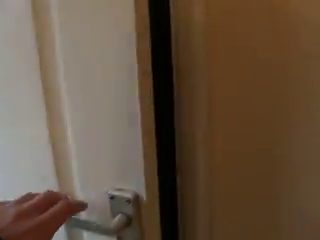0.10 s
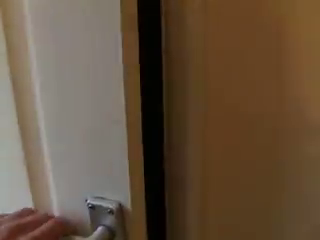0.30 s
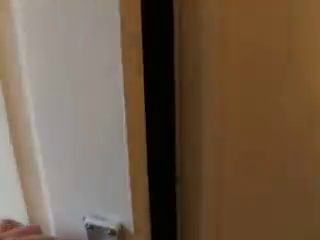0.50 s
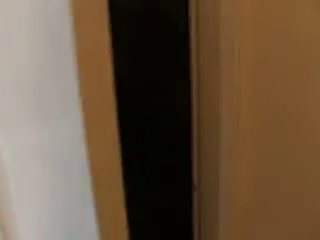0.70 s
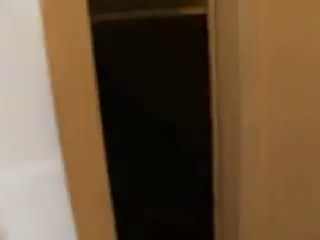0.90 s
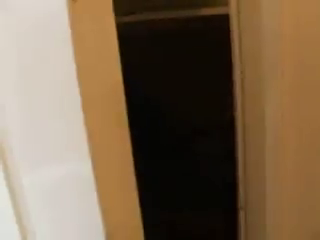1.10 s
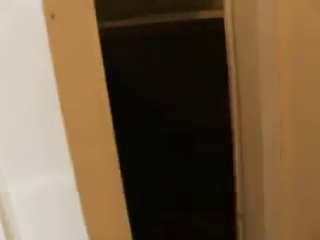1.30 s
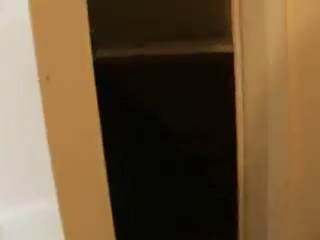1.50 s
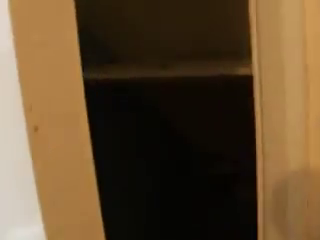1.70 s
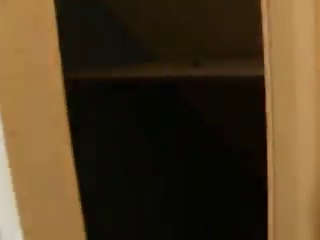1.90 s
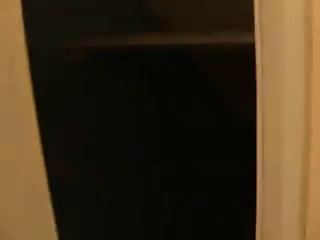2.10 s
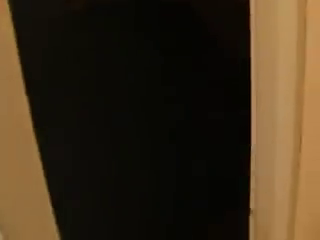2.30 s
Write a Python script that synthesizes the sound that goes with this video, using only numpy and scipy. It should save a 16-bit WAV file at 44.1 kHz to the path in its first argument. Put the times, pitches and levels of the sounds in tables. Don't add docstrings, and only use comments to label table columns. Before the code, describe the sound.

A metal door latch snaps back with one loud, bright clack close to a small, grainy microphone, then a heel ticks and steps hollowly on wooden boards, followed by two light knocks in a hallway.

```python
import sys
import numpy as np
from scipy import signal
from scipy.io import wavfile
from scipy.ndimage import uniform_filter1d

SR = 44100
rng = np.random.default_rng(int(sys.argv[2]) if len(sys.argv) > 2 else 0)


def generate_wav(sig):
    pcm = np.round(np.clip(np.atleast_2d(sig).T, -1, 1) * 32767).astype(np.int16)
    wavfile.write(sys.argv[1], SR, pcm)


def voltage_ratio(decibels):
    exponent = np.asarray(decibels, float) / 20
    return 10 ** exponent


N = 105840

# t/s, strength level/dB, damping factor/1, treble tilt/(dB per octave)
LATCH_HITS = [(0.188, -40.5, 1.2, -7), (0.1953, -44.5, 2.5, 13), (0.1983, -42.5, 2.1, 10.5),
              (0.2047, -37, 1.9, 3), (0.2145, -23.5, 5.9, 6.5), (0.2175, -28.5, 0.83, -7.5),
              (0.2337, -14, 2.78, 8.1), (0.2342, -17, 2.5, 6), (0.2373, -18.5, 1.1, -2),
              (0.2437, -25.5, 2.6, 4.5), (0.2456, -22.5, 2.2, 0.5), (0.2604, -39, 6.3, 2)]
# f/Hz, level/dB, t60/s
LATCH_MODES = [(800, -17.5, 0.009), (1452, -9, 0.036), (1890, -3.5, 0.014), (2310, -9.5, 0.022),
               (2560, -0.3, 0.041), (2820, -5.5, 0.023), (3164, -13, 0.044), (3810, -8, 0.05),
               (4370, -8, 0.022), (4630, -5.5, 0.02), (5630, -8, 0.018), (6200, -2.5, .016),
               (6940, -10, 0.018), (7865, -10.5, 0.022)]
# t/s, peak level/dB, f/Hz, t60/s
BOLT_SLAM = [
    (0.2338, 0.5, 2220, 0.009),
    (0.2337, -9, 2560, 0.029),
    (0.2354, -11, 5050, 0.011),
]
# t/s, peak level/dB, f/Hz, t60/s, spread/octave
TICKS = [(0.085, -26.5, 918, 0.012, 0.42), (0.0926, -36, 1060, 0.0054, 0.23),
         (0.8586, -16, 5660, 0.0056, 0.19), (0.8591, -23.5, 2530, 0.0064, 0.1),
         (.8588, -35.5, 1275, 0.011, 0.28), (.967, -29.5, 1710, 0.018, 0.22),
         (.983, -29.5, 1140, 0.013, 0.18), (0.9186, -19.5, 5270, 0.009, 0.42),
         (0.921, -18, 5180, 0.0065, 0.27), (0.9193, -32.5, 1053, 0.045, 0.035),
         (0.924, -20.5, 6600, 0.004, 0.19), (0.9308, -27, 1174, .012, 0.18),
         (.994, -32.5, 2090, 0.055, 0.045), (1.7558, -34.5, 2204, 0.2, 0.169),
         (1.758, -34, 7060, 0.02, 0.11), (1.8554, -22.5, 5000, 0.0063, 0.64),
         (1.862, -36, 1780, 0.15, 0.102), (1.858, -41.5, 5270, 0.11, 0.038),
         (2.212, -47, 2750, 0.0083, 0.071), (2.3647, -26.5, 6200, 0.0028, 0.2),
         (2.371, -41.5, 2150, 0.021, 0.073)]
# t/s, strength level/dB, rattle t60/s, favoured f/Hz, fall off it/(dB per octave)
STEPS = [
    (0.242, -59.5, 0.11, 139, -15),
    (.312, -45.5, .45, 424, -11),
    (.46, -53, 0.43, 550, -11),
    (.916, -34.5, 0.55, 800, -3.5),
    (.930, -34, .55, 105, -4.5),
    (1.753, -46.5, 0.14, 251, -11),
    (1.83, -52, 0.55, 413, -9.5),
    (1.05, -49.5, 0.68, 371, -28),
]
# f/Hz, width/Hz, level/dB
BOARD_MODES = [(50, 33, -7.5), (73.5, 26, 0), (105, 75, -4.5), (151, 21, -2), (210.4, 55, -6.5),
               (251, 35, -3), (297, 23.5, -7), (371, 33, -6), (451, 115, -6), (550, 85, -7),
               (704, 68, -8.5), (900, 90, -7), (1040, 240, -4.5), (1450, 300, -4)]
# t/s, length/s, level/dB,
# centre f/Hz, width/Hz
SCUFFS = [(0.186, 0.063, -44.5, 4740, 6050), (0.253, .11, -47, 5920, 2440),
          (0.456, 0.03, -45.5, 1225, 1460), (0.48, 0.053, -45, 1414, 1000),
          (0.857, 0.09, -42.5, 3900, 6000), (0.909, 0.13, -37, 5650, 5000), (0.921, 0.14, -48, 2200, 1500),
          (1.25, 0.6, -54, 1407, 3050), (1.76, 0.079, -44, 5400, 6030), (1.852, 0.054, -45, 4400, 6040),
          (2.367, 0.02, -49, 3930, 6000), (2.39, 0.11, -41, 5460, 3020), (1.3, 0.37, -61.5, 800, 117),
          (1.451, 0.55, -54.5, 6040, 4020), (0.779, 0.064, -51, 5020, 6000),
          (1.599, 0.68, -57.5, 39.6, 38.6), (0.456, 0.056, -54.5, 2900, 2500)]
# f/Hz, t60/s
HALL_T60 = [(100, 0.39), (500, 0.21), (2000, 0.2), (8000, 0.28)]
# t/s, peak level/dB, f/Hz, t60/s
SWAY = [
    (.51, -49, 4.8, 1.1),
    (.865, -53, 6.2, .9),
    (1.04, -50, 5.2, 2.6),
]
# f/Hz, level/dB
HISS_SPECTRUM = [(15, -27), (28, 5), (118, -6), (300, -7), (600, -6), (2400, -9.5), (6500, -9.5),
                 (7900, -10.5)]
# t/s, level/dB
HISS_LEVEL = [(0, -51), (.16, -52), (.31, -49.5), (.49, -53.5), (.65, -56), (.8, -54.5), (.95, -49),
              (1.269, -52.5), (1.72, -51), (1.96, -52), (2.4, -53.5)]

MODE_SPLIT, LATCH_RATTLE_S, THIN_HZ = 0.022, 0.00094, 450
BLOWS_PER_S, BOARD_SPREAD = 700, 0.049
SCUFF_RISE, SCUFF_FADE_DB = 0.061, -13
GRIT_PER_S, GRIT_DB = 3000, 4
HALL_DB, HALL_DELAY_S = -20, 0.004
PATCH_DB, HISS_TRIM_DB = 1.2, 4.5
STEP, HALF_RANGE, LEAN = np.sqrt(0.5) / 128, 128, 0.07
ANTIALIAS_HZ, CLIP, EDGE_HZ = 8220, 0.705, 16300


def evened(x):
    return x / np.sqrt(np.mean(x ** 2) + 1e-20)


def read(points, hz):
    f, value = np.transpose(points)
    return np.interp(np.log(hz + 1), np.log(f + 1), value)


def add(mix, s, sound):
    part = mix[round(s * SR):][:len(sound)]
    part += sound[:len(part)]


def ring(hz, t60, phase=0):
    t = np.arange(6000) / SR
    return voltage_ratio(-60 * t / t60) * np.sin(2 * np.pi * hz * t + phase)


def resonate(x, hz, width):
    pole = np.exp((2j * hz - width) * np.pi / SR)
    return 2 * signal.lfilter([1 - abs(pole)], [1, -pole], x).real


def grit(size, per_s, spread_db):
    sign, chance, size_draw = rng.random((size, 3)).T
    return np.sign(sign - 0.5) * (chance < per_s / SR) * voltage_ratio(-spread_db * np.log(size_draw + 0.01))


def thin(x):
    return signal.sosfilt(signal.butter(3, THIN_HZ, "high", fs=SR, output="sos"), x)


def latch():
    out, t = np.zeros(N), np.arange(200) / SR
    for s, db, damp, tilt_db in LATCH_HITS:
        modes = 0
        for hz, level_db, t60 in LATCH_MODES:
            a, b, c = rng.uniform(-1, 1, 3)
            twin_hz = hz * (1 + MODE_SPLIT * np.sign(b) * (1 + abs(b)))
            pair = ring(hz, t60 / damp, np.pi * a) + 0.69 * ring(twin_hz, t60 / damp, np.pi * c)
            modes = modes + voltage_ratio(db + level_db + tilt_db * np.log2(hz / 2500)) * pair
        rattle = np.exp(-t / LATCH_RATTLE_S) * grit(len(t), 5000, 1.1) * 0.5
        rattle[0] = 1
        add(out, s, np.convolve(modes, rattle / np.linalg.norm(rattle)))
    for s, db, hz, t60 in BOLT_SLAM:
        add(out, s, voltage_ratio(db) * ring(hz, t60))
    return thin(out)


def steps():
    out, t = np.zeros(N), np.arange(SR // 2) / SR
    for s, db, t60, spot_hz, fall_db in STEPS:
        blows = grit(len(t), BLOWS_PER_S, 2.56)
        blows[0] = 3.3
        blows = blows * voltage_ratio(-60 * t / t60)
        detune = 1 + BOARD_SPREAD * rng.standard_normal(len(BOARD_MODES))
        body = 0
        for k, (f, width, level_db) in enumerate(BOARD_MODES):
            hz = f * detune[k]
            gain = (-1) ** k * voltage_ratio(level_db + fall_db * abs(np.log2(f / spot_hz))) / np.sqrt(width)
            body = body + gain * resonate(resonate(blows, hz, width), hz, 4 * width)
        add(out, s, voltage_ratio(db) * body / np.sqrt(np.mean(body[:3000] ** 2)))
    return out


def ticks():
    out = np.zeros(N)
    for s, db, hz, t60, octaves in TICKS:
        jitter, phases = rng.uniform(-1, 1, (2, 7))
        places = np.linspace(-1, 1, 7) + jitter / 7
        bunch = sum(ring(hz * 2 ** (octaves * place), t60, phase) for place, phase in zip(places, phases))
        add(out, s, voltage_ratio(db) / 4 * bunch)
    return thin(out)


def scuffs():
    out = np.zeros(N)
    for s, length, db, hz, width in SCUFFS:
        rub = grit(SR // 2, GRIT_PER_S, GRIT_DB)
        rub = evened(rub) + 0.97 * rng.standard_normal(len(rub))
        u = np.arange(len(rub)) / SR / length
        shape = np.minimum(u / SCUFF_RISE, 1) * voltage_ratio(SCUFF_FADE_DB * np.minimum(u, 4) ** 2)
        add(out, s, voltage_ratio(db) * shape * evened(resonate(resonate(rub, hz, width), hz, width)))
    return out


def hall(x):
    taps = np.zeros(SR // 2)
    at = np.arange(0, len(taps) - 20, 20)
    taps[at + rng.integers(0, 20, len(at))] = rng.choice([-1.0, 1.0], len(at))
    hz, t, bands = signal.stft(taps, SR, nperseg=256)
    decay = voltage_ratio(-60 * t / read(HALL_T60, hz)[:, None])
    tail = signal.istft(bands * decay, SR, nperseg=256)[1]
    tail = np.r_[np.zeros(round(HALL_DELAY_S * SR)), tail / np.linalg.norm(tail)]
    return signal.fftconvolve(x, tail)[:N]


def sway():
    out, t = np.zeros(N), np.arange(N) / SR
    for s, db, hz, t60 in SWAY:
        add(out, s, voltage_ratio(db - 60 * t / t60) * np.sin(2 * np.pi * hz * t))
    return out


def hiss():
    frames, hz = N // 256 + 5, np.fft.rfftfreq(1024, 1 / SR)
    real, imag, patches = rng.standard_normal((3, 513, frames))
    patches = uniform_filter1d(patches, size=14, axis=0)
    patches = evened(uniform_filter1d(patches, size=12, axis=1))
    colour = voltage_ratio(read(HISS_SPECTRUM, hz)[:, None] + PATCH_DB * patches)
    x = signal.istft((real + 1j * imag) * colour, nperseg=1024, noverlap=768)[1][:N]
    s, db = np.transpose(HISS_LEVEL)
    return evened(x) * voltage_ratio(HISS_TRIM_DB + np.interp(np.arange(N) / SR, s, db))


def scene():
    near, far = latch(), ticks() + steps()
    echo = hall(voltage_ratio(HALL_DB) * near + voltage_ratio(-6) * far)
    return (near + far + scuffs() + echo + sway() + hiss())[None]


def band_limit(x):
    return signal.sosfilt(signal.butter(12, 16820, fs=SR, output="sos"), x)


def record(dry):
    smooth = signal.firwin(36 * 441 + 1, ANTIALIAS_HZ, window=("kaiser", 9), fs=160 * SR)
    low = signal.resample_poly(dry, 160, 441, axis=1, window=smooth)
    levels = STEP * np.clip(np.floor(low / STEP + LEAN), -HALF_RANGE, HALF_RANGE - 1)
    x = signal.resample_poly(levels, 441, 160, axis=1, window=smooth)[:, :N]
    x = np.clip(x, -CLIP, CLIP)
    edge = signal.firwin(255, EDGE_HZ, window=("kaiser", 10), fs=SR)
    mix = signal.oaconvolve(x, edge[None], "same")
    return band_limit(mix)


dry = scene()
out = record(dry)
generate_wav(out)
```